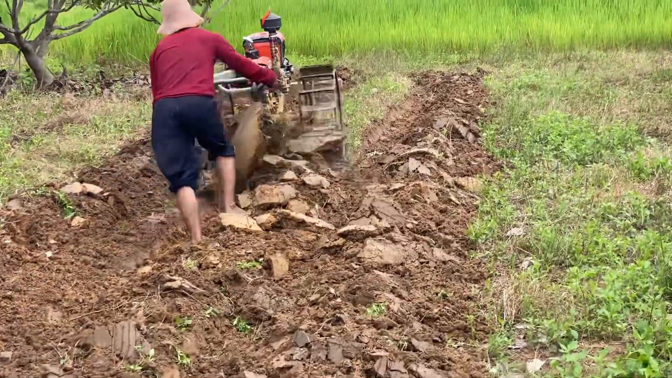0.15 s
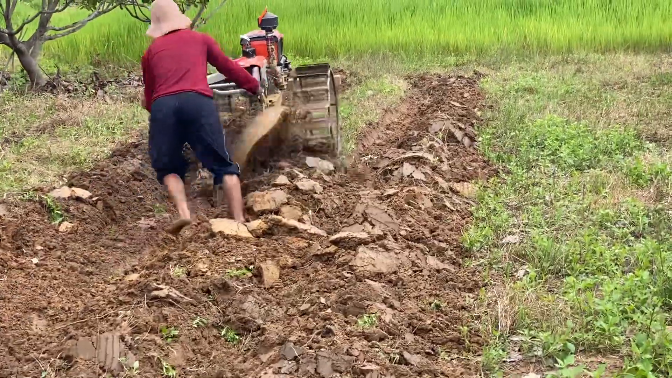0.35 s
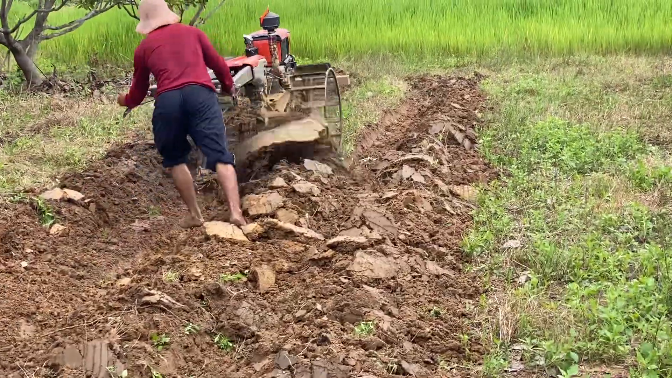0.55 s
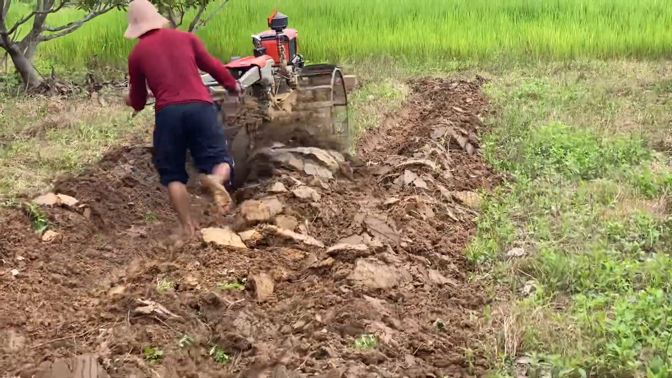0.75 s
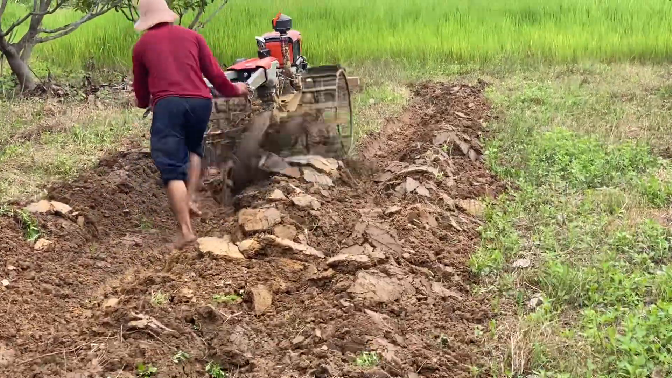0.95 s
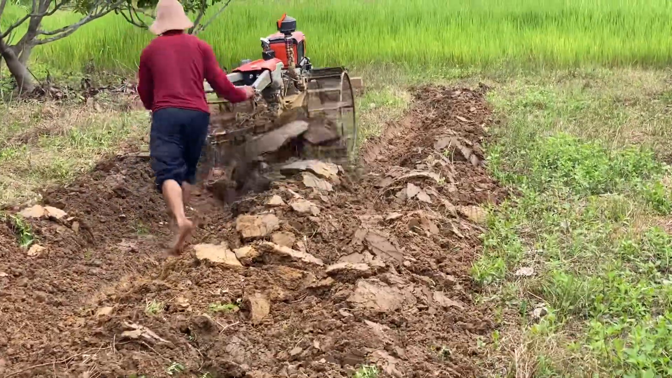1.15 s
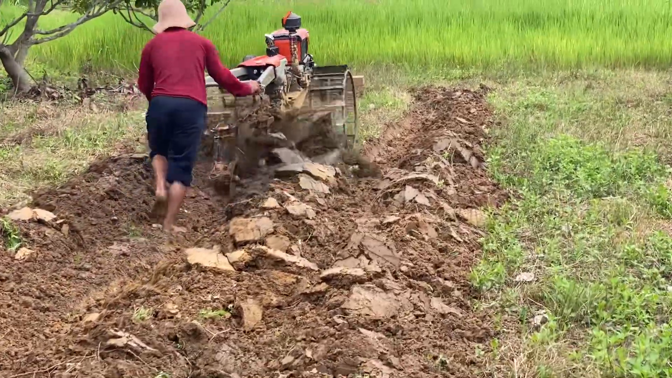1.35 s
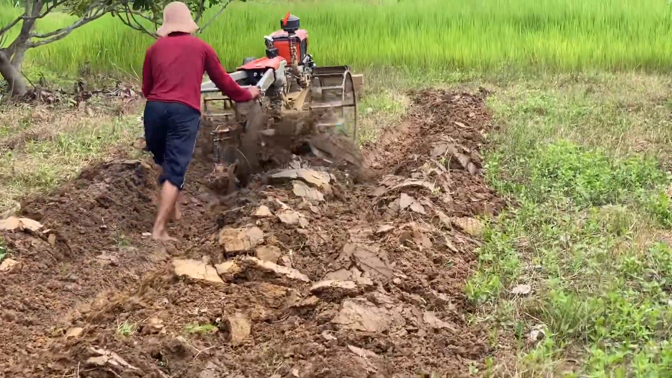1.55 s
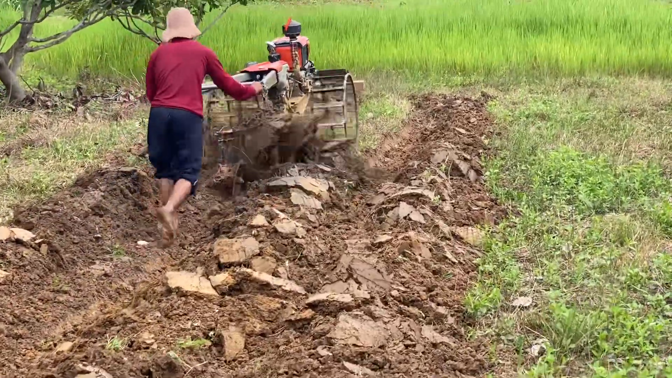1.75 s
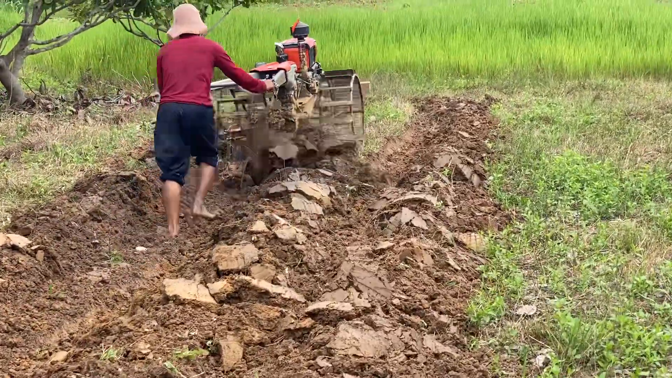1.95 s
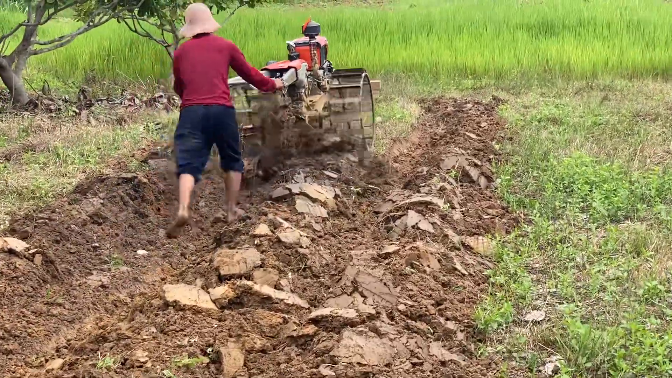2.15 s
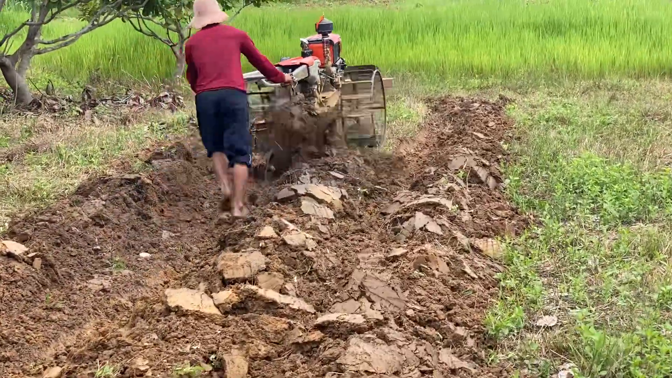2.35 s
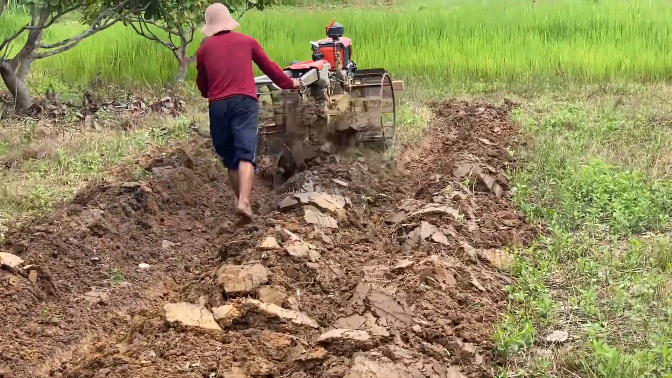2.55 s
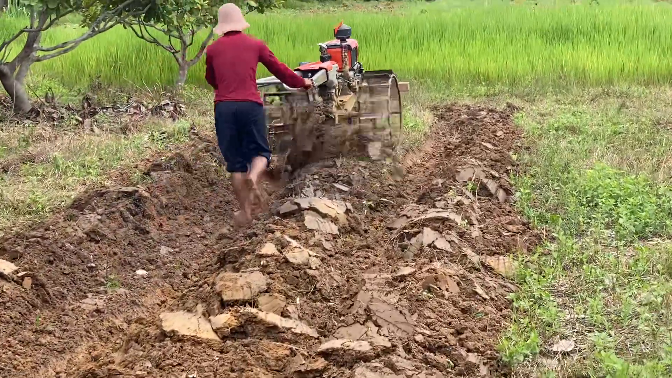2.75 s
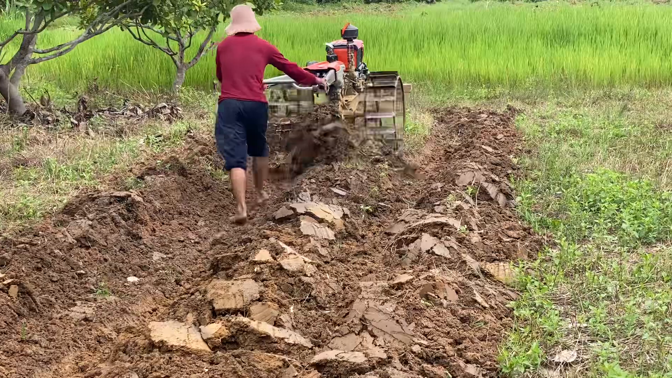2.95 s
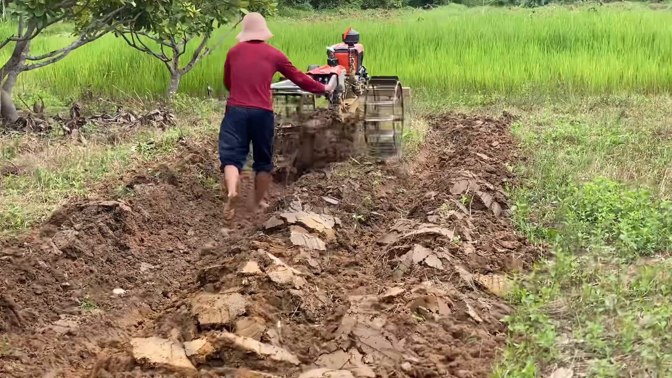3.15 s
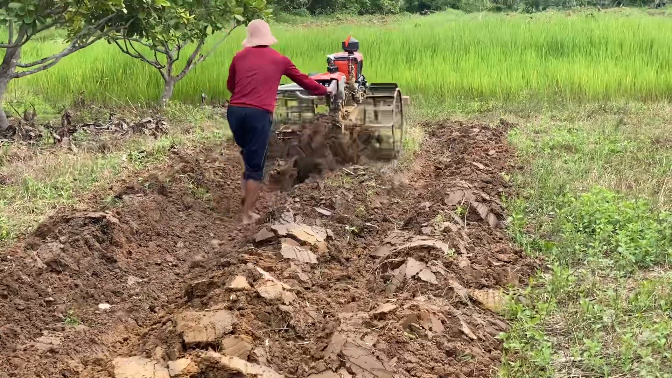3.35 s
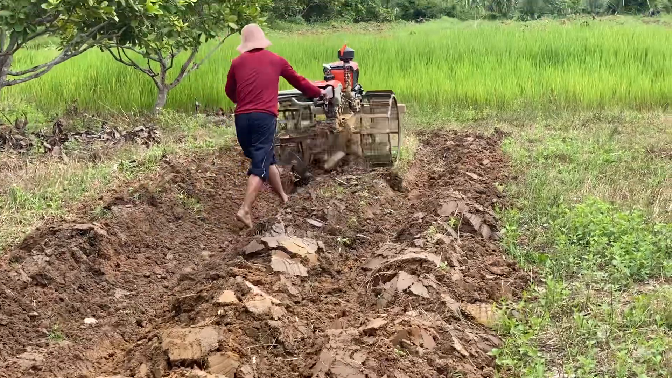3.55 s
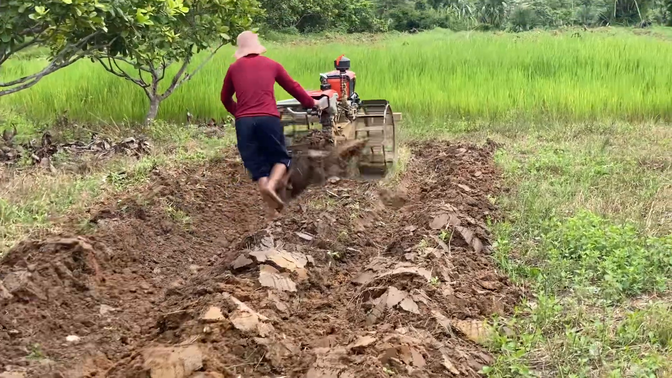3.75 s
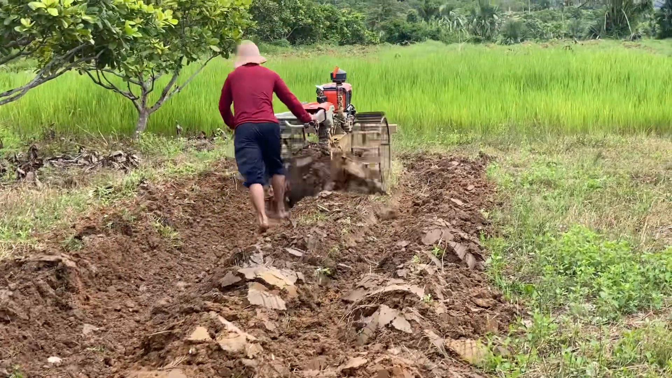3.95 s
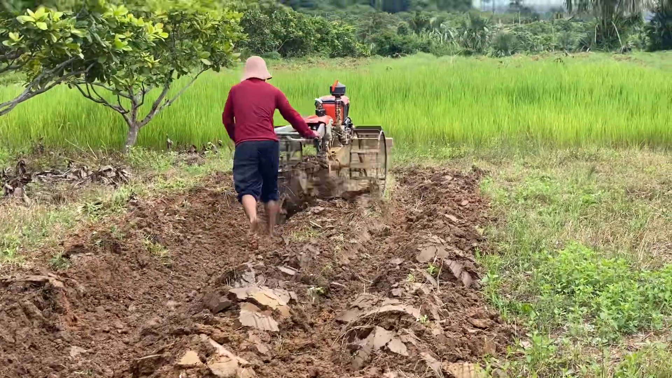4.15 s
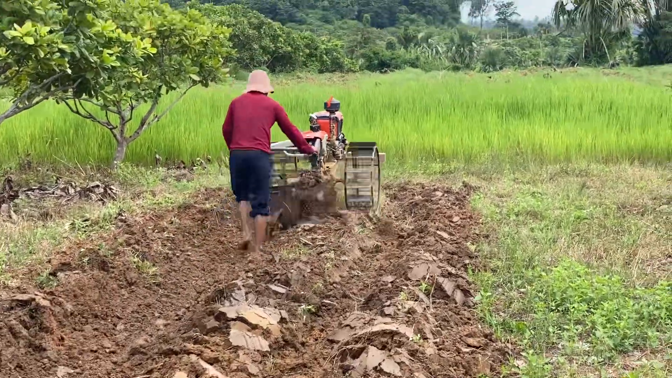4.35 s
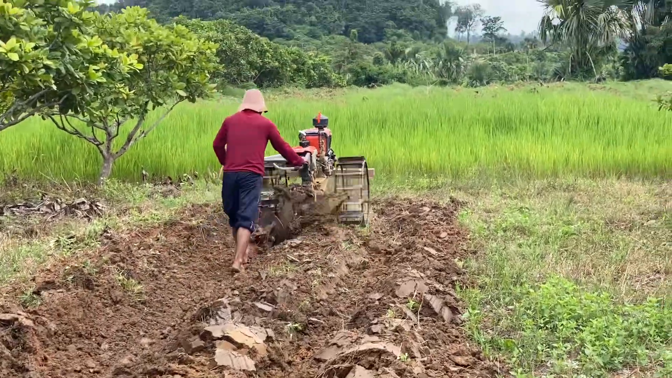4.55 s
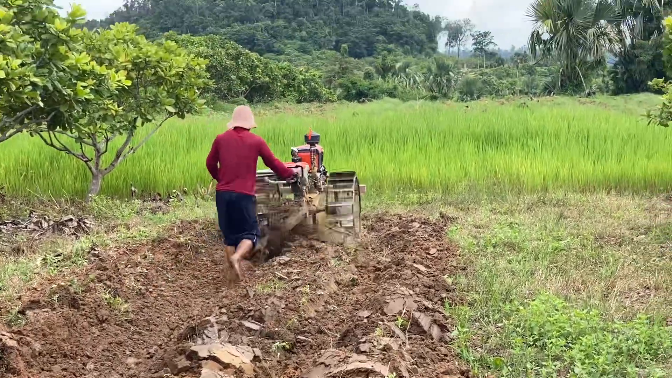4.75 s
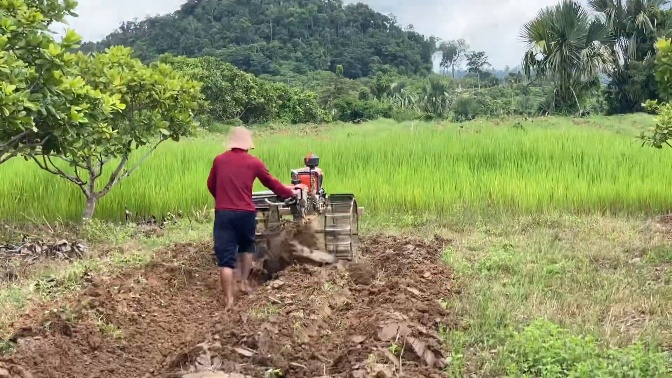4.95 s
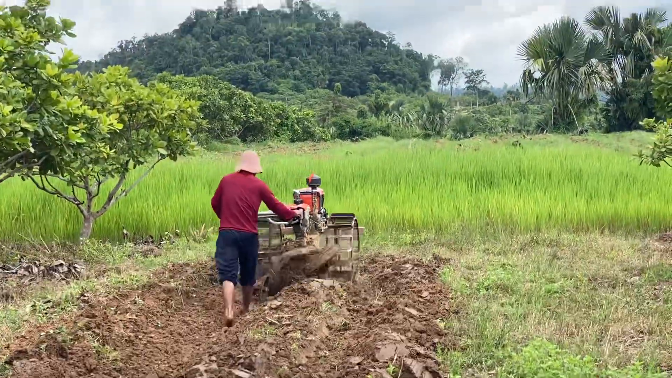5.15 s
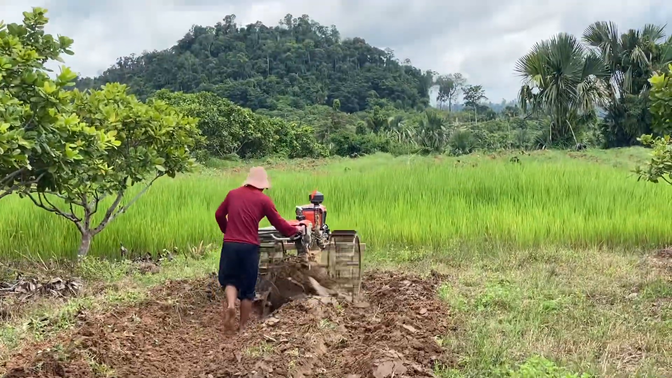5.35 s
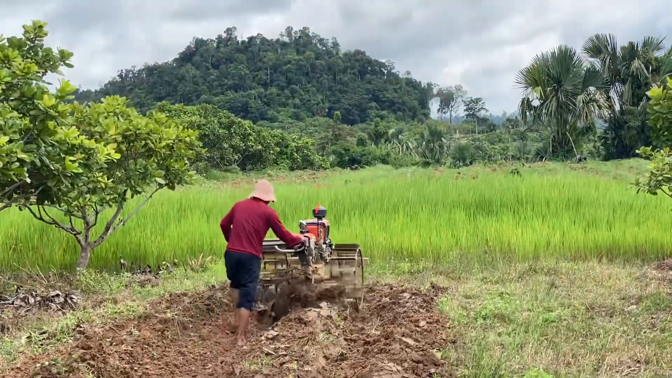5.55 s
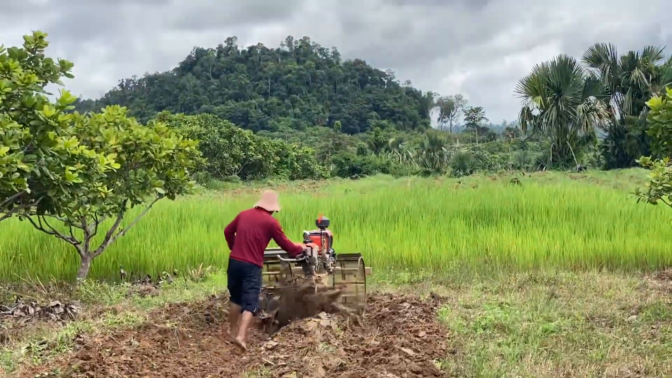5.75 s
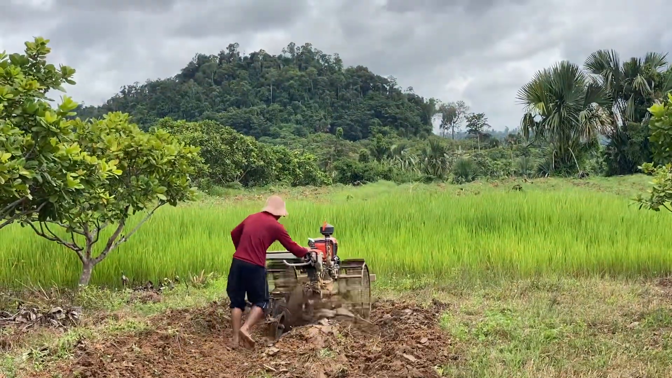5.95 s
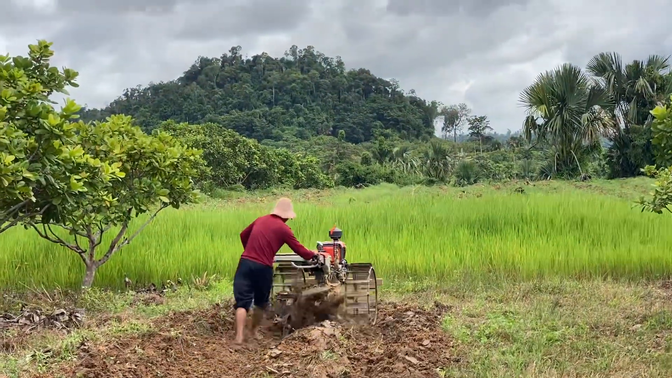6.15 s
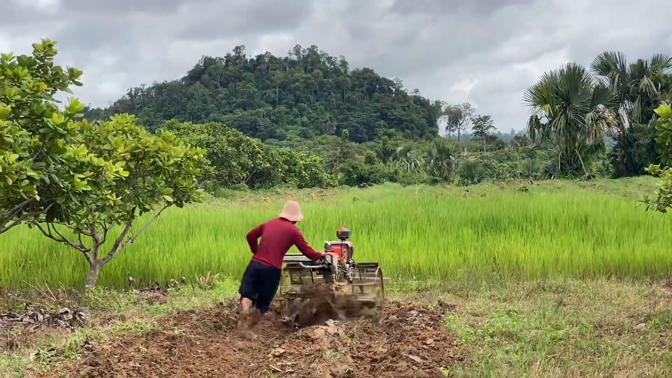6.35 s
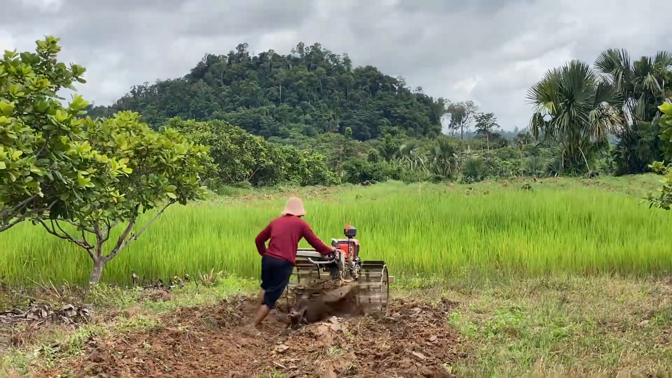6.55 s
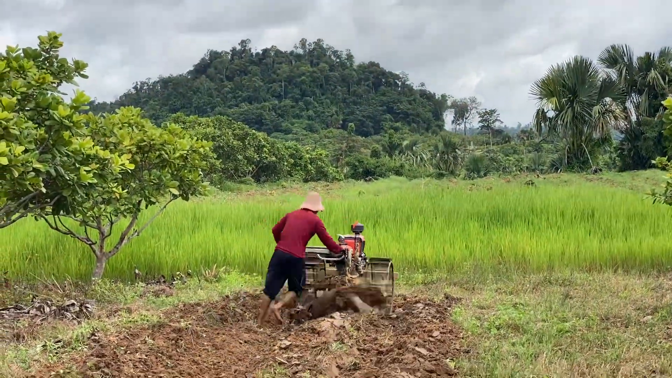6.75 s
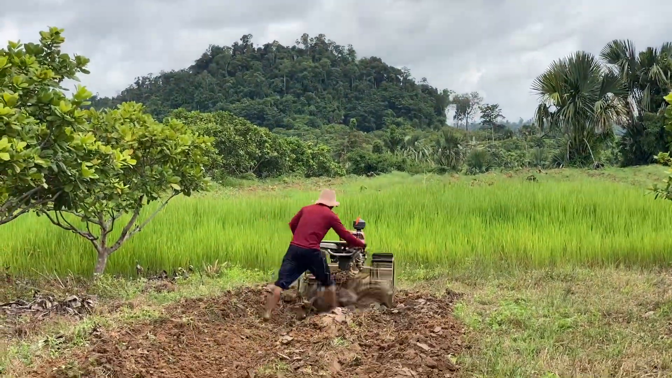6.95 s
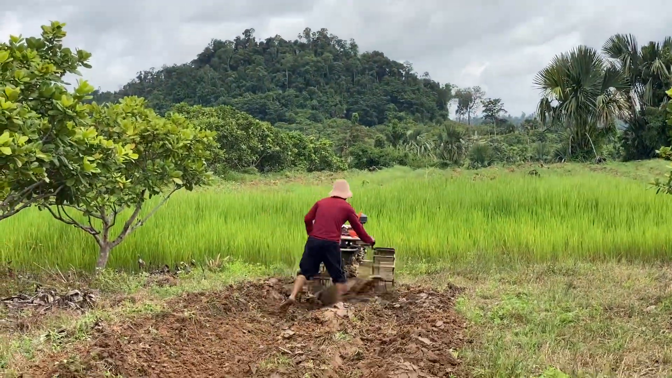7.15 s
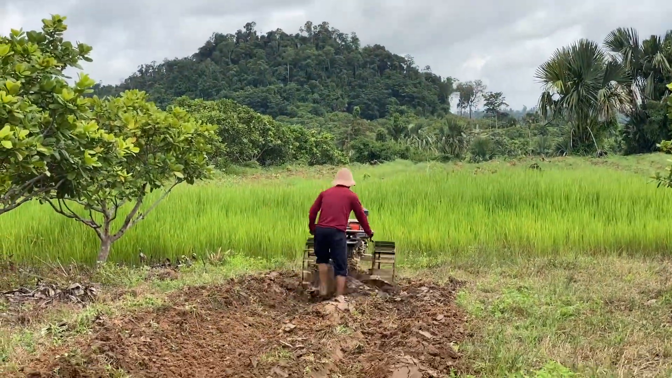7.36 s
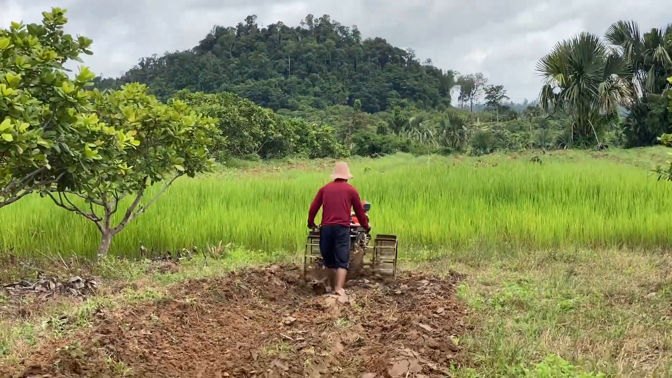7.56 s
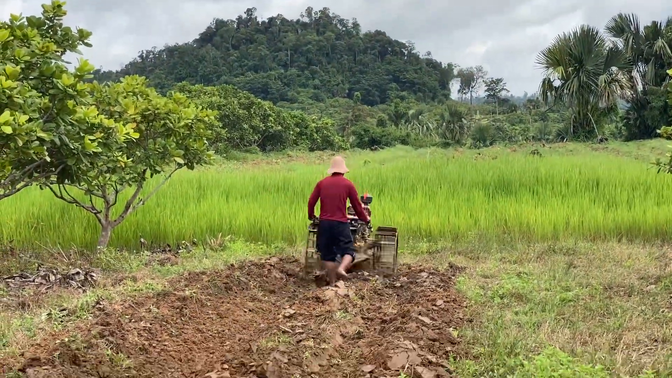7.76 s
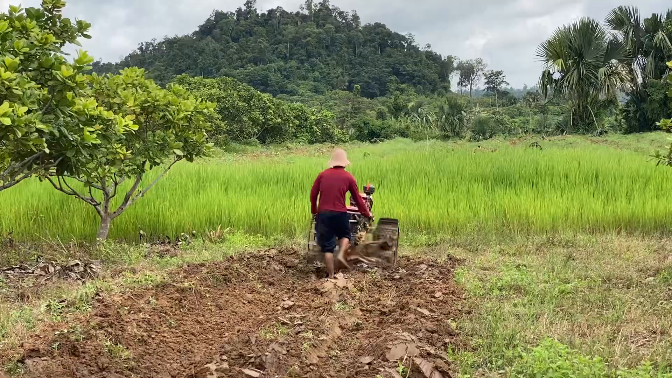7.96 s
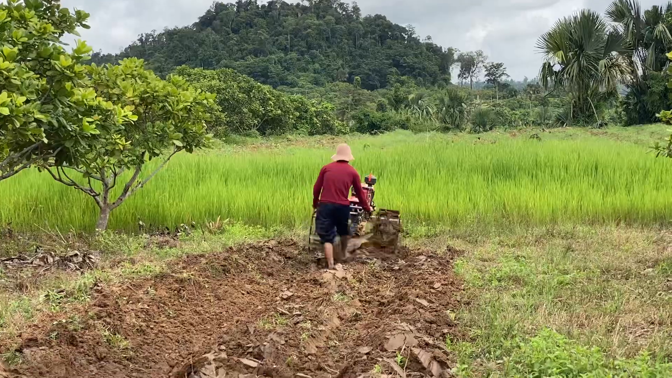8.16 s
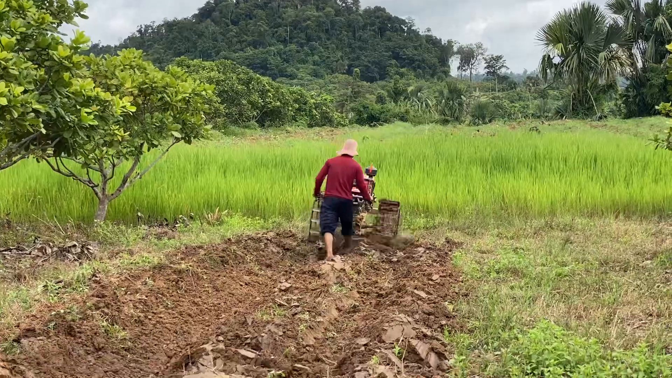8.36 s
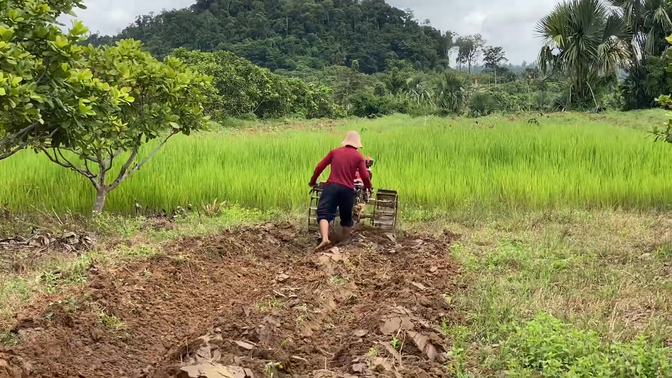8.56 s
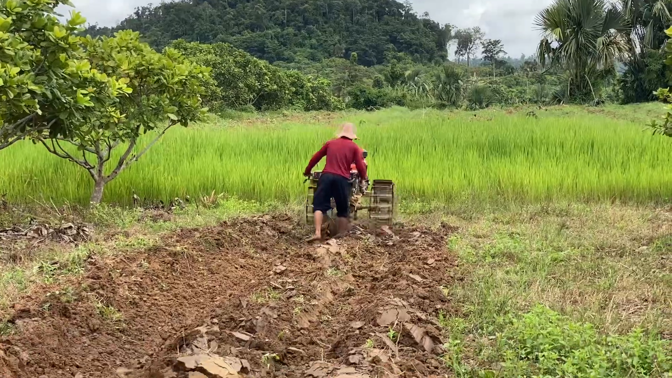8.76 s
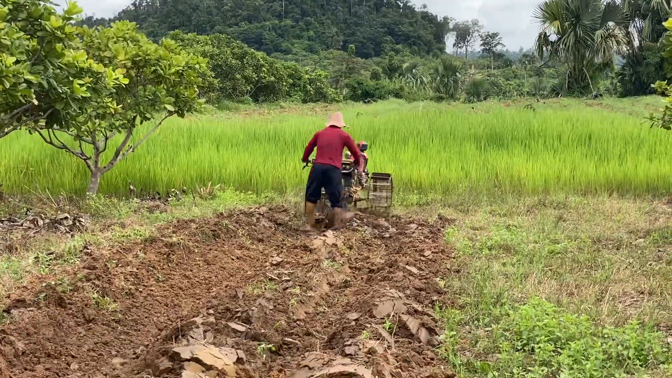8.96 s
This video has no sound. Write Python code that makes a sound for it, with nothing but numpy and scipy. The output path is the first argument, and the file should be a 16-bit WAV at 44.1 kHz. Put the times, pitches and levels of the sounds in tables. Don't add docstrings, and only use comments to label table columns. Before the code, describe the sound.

Fast thudding one-cylinder engine with metallic knocking and loose rattles recedes across an open field, sags in speed, while insects sing thinly and high.

```python
import sys
import numpy as np
from scipy import signal
from scipy.fft import rfft, irfft, next_fast_len
from scipy.io import wavfile
from scipy.ndimage import uniform_filter1d

SR = 44100
rng = np.random.default_rng(int(sys.argv[2]) if len(sys.argv) > 2 else 0)


def wav_record(signal):
    frames = np.transpose(np.atleast_2d(signal))
    bounded = np.clip(frames, -1, 1)
    quanta = np.round(bounded * 32767).astype(np.int16)
    wavfile.write(sys.argv[1], SR, quanta)


def gain_from_decibels(decibels):
    exponent = np.asarray(decibels, float) / 20
    return 10 ** exponent


N = 397773
TIME = np.arange(N) / SR
OVERLAP_SHARE, INTAKE_SHARE, KNOCK_SHARE, TICK_SHARE = .2847, .5427, .745, .43
TURN_S = 7.15


def along(table, hz):
    f, v = np.transpose(table)
    return np.interp(np.log(hz + 1), np.log(f + 1), v)


def colour(x, table):
    size = next_fast_len(N)
    hz = np.fft.rfftfreq(size, 1 / SR)
    return irfft(rfft(x, size) * gain_from_decibels(along(table, hz)), size)[:N]


def unit(x):
    return x / np.sqrt(np.mean(x ** 2))


def noise(table):
    return unit(colour(rng.standard_normal(N), table))


def walk(rate_hz):
    k = int(SR / rate_hz)
    steps = np.repeat(rng.standard_normal(N // k + 1), k)
    return 1.37 * uniform_filter1d(uniform_filter1d(steps, k), k)[:N]


def strike(times, gains, shape):
    train, lead = np.zeros(N + SR), SR // 4
    at = (np.asarray(times) * SR).astype(int) + lead
    np.add.at(train, np.clip(at, 0, N + SR - 1), gains)
    return signal.oaconvolve(train, shape)[lead:lead + N]


def fade(rise_s, t60_s):
    t = TIME[:SR // 3]
    return (1 - np.exp(-t / rise_s)) * np.exp(-np.log(1000) * t / t60_s)


def ring(modes, rise_s):
    t, out = TIME[:SR // 3], 0
    for hz, db, t60_s, *sign in modes:
        out = out + np.prod(sign) * gain_from_decibels(db) * np.sin(2 * np.pi * hz * t) * fade(rise_s, t60_s)
    return out


def resonate(push, modes, rise_s):
    return signal.fftconvolve(push, ring(modes, rise_s))[:N]


def moments(s, share):
    edges = np.concatenate([[2 * s[0] - s[1]], s, [2 * s[-1] - s[-2]]])
    return edges[:-1] + share * np.diff(edges)


def bump(times, at_s, half_s, db):
    return db * np.exp(-((times - at_s) / half_s) ** 2)


def overrun_db(times):
    return bump(times, 3.38, .2, 3)


# start_s, load_db, facing_db
WORK = [(0, -1, 0.5), (1.6, 1.5, -0.5), (1.75, .5, 2.5), (1.95, .5, 5.5), (3.16, 3, 7.5), (3.3, -2.5, 0.5),
        (3.6, -6, -1), (3.72, -7.5, 5), (3.84, -5, 9), (3.97, -0.5, 1.5), (4.25, 1, -2), (4.55, 3.5, 1.5),
        (4.8, 2, 3), (6.3, 2, 4), (6.95, 3, 3), (7.9, -0.5, 0), (8.15, 0, 2.5), (9.02, 0, -1.5)]


def rule(times, start_db, distance, load, facing):
    at, load_db, facing_db = np.transpose(WORK)
    leaving_db = -0.7432 * times
    return (start_db + distance * leaving_db + load * np.interp(times, at, load_db)
            + facing * np.interp(times, at, facing_db))


# start_s, speed_hz [cycles/s]
SPEED = [(0.0, 9.477), (1.248, 9.398), (1.683, 9.64), (2.256, 9.491), (3.097, 9.702), (3.846, 7.988),
         (3.92, 7.439), (4.39, 7.996), (4.442, 8.125), (4.573, 8.607), (5.003, 8.337), (5.798, 8.501),
         (6.634, 8.232), (6.93, 8.572), (8.252, 7.486), (8.407, 7.117), (8.679, 6.996), (9.02, 7.475)]
# start_s, level_db
LEAN = [(.533, -0.5), (3.262, -0.5), (4.719, -3.5), (4.956, -3), (5.434, -0.9), (5.669, -1.5),
        (6.143, -1.2), (7.098, -1), (7.338, -1.1), (7.965, -0.5), (8.227, -1), (8.364, -2.5), (8.926, -5)]


def firings():
    cycles = np.cumsum(np.interp(TIME, *np.transpose(SPEED))) / SR
    s = np.interp(np.arange(.0603, cycles[-1]), cycles, TIME)
    chance, lean_db = rng.standard_normal((5, len(s))), np.zeros(len(s))
    for t, db in LEAN:
        lean_db[np.argmin(abs(s - t))] = db
    turned = s > TURN_S
    light_db = np.minimum(rule(s, 0.5, 0, 1, 0), 0)
    puff_loss_db = np.maximum(5.5 * (lean_db + light_db), -24)
    thud_db = rule(s, 4, 1.65, 1.08, -0.06) + lean_db + 1 * turned + .5 * chance[0]
    echo = rule(s, 0.64, 0, 0.1, -0.0817) + 0.31 * turned + 0.09 * chance[1]
    knock_db = rule(s, -27.5, 1.58, 0.66, 0.78) + light_db + 1.4 * chance[2]
    puff_db = rule(s, -36.5, 1.78, 2.03, -0.84) + puff_loss_db - 3.5 * turned + 0.5 * chance[3]
    clack = turned * gain_from_decibels(-30.5 + 3.5 * lean_db + 3 * chance[4])
    return s, thud_db, echo, knock_db, puff_db, clack


# pitch_hz, level_db, t60_s, polarity
EXHAUST = [(52, -20.8, .153, 1), (60, -18.9, .101, 1), (85, -.7, .0346, -1), (142, 2.8, .0153, 1),
           (205, -24, .04, -1)]


def exhaust(s, thud_db, echo):
    pipe_echo_s = .0132
    gains = np.append(gain_from_decibels(thud_db), echo * gain_from_decibels(thud_db))
    return strike(np.append(s, s + pipe_echo_s), gains, ring(EXHAUST, .012))


# pitch_hz, level_db, t60_s, polarity
OVERLAP = [(112, 8.1, .0322, -1), (114, 8.7, .0285, 1), (201, -17.5, .0244, 1)]


def overlap(s):
    times = moments(s, OVERLAP_SHARE)
    level_db = rule(times, 5.5, 0.97, 0, 0.2) + overrun_db(times)
    return strike(times, gain_from_decibels(level_db + 0.69 * rng.standard_normal(len(times))), ring(OVERLAP, .013))


# pitch_hz, level_db, t60_s, polarity
INTAKE = [(105, -11.1, .1, -1), (106, -9.5, .04, 1), (207, -30, .07, -1)]


def intake(s):
    times = moments(s, INTAKE_SHARE)
    level_db = rule(times, 4.5, 1.6, 0.05, 0.27) + bump(times, 3.85, 0.13, -3.5) + overrun_db(times)
    return strike(times, gain_from_decibels(level_db + 0.69 * rng.standard_normal(len(times))), ring(INTAKE, .0139))


# pitch_hz, level_db, t60_s
BLOCK = [(560, -13.5, 0.054), (801, -14.5, 0.073), (892, -11, 0.072), (1235.6, -3, 0.043),
         (1297, -14, 0.083), (1435, 3, 0.027), (1511.6, -4, 0.075), (1490, -49, 0.012),
         (1810, -15.5, 0.089), (2270, -10.5, 0.035), (2770, -14, 0.043), (3170, -12, 0.023),
         (4590, -22, 0.02), (5800, -37.5, 0.0086)]


def knock(s, knock_db, clack):
    times, size = moments(s, KNOCK_SHARE)[:-1], gain_from_decibels(knock_db)
    push = strike(times, size, np.ones(1))
    push += gain_from_decibels(-27.5) * strike(times, size, fade(.001, .05)) * rng.standard_normal(N)
    push += strike(s - .00137, gain_from_decibels(-7.0) * clack, np.ones(1))
    return gain_from_decibels(4) * resonate(push, BLOCK, 0.00095)


# pitch_hz, level_db
PUFF = [(300, -14.5), (700, -10), (1480, -24), (1890, -16.5), (3150, -15), (3900, -25), (4620, -19.5),
        (5810, -25), (6600, -22), (8410, -28), (10100, -36), (12000, -33.5), (15600, -57)]
# pitch_hz, level_db, t60_s
TIN = [(2220, 2, 0.011), (2880, -9, 0.15), (3208, -7, 0.086), (4600, 5, 0.011), (5330, -18, 0.02),
       (6505, 4, 0.0093)]


def puff(s, puff_db):
    gust = strike(s - .0035, gain_from_decibels(puff_db), fade(0.0012, 0.04))
    shaken = resonate(gust * rng.standard_normal(N), TIN + BLOCK, 0.00086)
    return gain_from_decibels(13.5) * gust * noise(PUFF) + gain_from_decibels(-15.5) * shaken


# pitch_hz, level_db [per Hz]
CLATTER = [(150, -10.5), (250, -1), (340, -6), (593, -13), (902, -9), (1110, -12), (1210, -6.5),
           (1490, -8.5), (1710, -15.5), (2750, -16), (3840, -24), (4540, -24.5), (7000, -30.5), (9100, -51),
           (15400, -120)]


def rattle():
    out = 0
    for hz in 250 * 2 ** np.arange(0, 5.5, .5):
        edges_hz = [hz / 2 ** 0.21, hz * 2 ** 0.23]
        sos = signal.butter(2, edges_hz, "band", fs=SR, output="sos")
        out = out + gain_from_decibels(2.78 * walk(60)) * signal.sosfilt(sos, rng.standard_normal(N))
    return unit(colour(out, CLATTER))


# pitch_hz, level_db
HISS = [(6000, -3.5), (7200, -8.5), (8000, -0.5), (9200, -8), (10800, -14), (12000, -12), (13200, -60),
        (15500, -28)]


def clatter(s):
    level_db = rule(TIME, -45.5, 1.19, 0.42, 0.06)
    shake = 0.36 + strike(moments(s, KNOCK_SHARE)[:-1], 1., fade(0.00048, 0.39))
    shake += strike(s, 0.48, fade(0.014, 0.31))
    shake += strike(moments(s, OVERLAP_SHARE), 0.55, fade(0.0016, 0.043))
    shake += strike(moments(s, 0.22), 0.45, fade(0.0033, 0.034))
    taps = (rng.random(N) < 180 / SR) * rng.standard_normal(N) * shake
    tapped = unit(resonate(taps, BLOCK + TIN, 0.00029))
    rattling = shake * (rattle() + gain_from_decibels(-12) * noise(HISS))
    return gain_from_decibels(level_db + 6) * rattling + gain_from_decibels(level_db - 7.5) * tapped


# start_s, level_db, length_s
SCRAPES = [
    (2.282, -39.5, 0.053),
    (4.358, -39, 0.071),
    (6.762, -30.5, 0.059),
    (6.96, -38, 0.082),
]


def scrape():
    rub = sum(strike([t], gain_from_decibels(db), fade(.002, 3 * length_s)) for t, db, length_s in SCRAPES)
    rub = rub * gain_from_decibels(3.5 * walk(300))
    share = resonate(rub * rng.standard_normal(N), [(3650, -0.5, 0.034), (3860, -18, 0.021)], 0.00033)
    grit = noise([(500, 0), (1500, 6.5), (3700, 3), (5200, -1.0), (7000, -8), (12000, -20)])
    return gain_from_decibels(-29.5) * share + rub * grit


def iron(s, knock_db, puff_db, clack):
    return knock(s, knock_db, clack) + puff(s, puff_db) + clatter(s) + scrape()


def uneven_rings(times, modes, level_db):
    level_db, out = level_db + overrun_db(times), 0
    for mode in modes:
        gains = gain_from_decibels(level_db + 4.5 * rng.standard_normal(len(times)))
        out = out + strike(times, gains, ring([mode], 0.0026))
    return out


# pitch_hz, level_db, t60_s
FRAME = [(330, 5, .05), (403, 2.5, 0.046), (524, -1, .04)]


def frame(s):
    times = moments(s, KNOCK_SHARE)
    return uneven_rings(times, FRAME, rule(times, -45, -1, -.5, -.2))


# pitch_hz, level_db, t60_s
TICK = [(3410, 9, 0.038), (2150, -11, .03)]


def pushrod(s):
    times = moments(s, TICK_SHARE)
    return uneven_rings(times, TICK, rule(times, -49, 1.5, .3, -.6))


def gear():
    pitch_hz = 1035 * (1 + .009 * walk(3.6) + 0.0097 * walk(25))
    phase = 2 * np.pi * np.cumsum(pitch_hz) / SR
    load_db = np.interp(TIME, [3.3, 3.45, 3.75, 3.9, 4.5, 4.8], [0.5, -6, -12, -3, -8, -17.0])
    return gain_from_decibels(-50.5 + 3.6 * walk(30) + load_db) * np.sin(phase)


# pitch_hz, level_db
SOIL = [(150, -18), (260, -5), (380, 7.5), (520, -2.5), (800, -28)]


def soil():
    lumps = (rng.random(N) < 45 / SR) * gain_from_decibels(10.4 * rng.standard_normal(N))
    heave = 0.19 + unit(signal.oaconvolve(lumps, fade(0.0024, 0.074))[:N])
    return gain_from_decibels(rule(TIME, -55.5, 1.8, -0.5, 0.4)) * heave * noise(SOIL)


# pitch_hz, width_hz, flicker_hz, swing_db
INSECTS = [(7440, 45, 22, 3), (13400, 180, 25, 3.5), (14620, 90, 30, 3.5)]
# start_s, level_db
INSECT_HUSH = [
    (3.27, 0),
    (3.36, -8),
    (3.93, -7),
    (3.97, 0),
]


def insects():
    hush_db = np.interp(TIME, *np.transpose(INSECT_HUSH))
    start_db, fall_db_per_s, swell_db = (-55.5, -79, -75), (-0.66, -.5, -0.44), (1.5, 2.5, .7)
    out = 0
    for (hz, width, flicker_hz, swing_db), db, fall, swell in zip(INSECTS, start_db, fall_db_per_s, swell_db):
        level_db = db + fall * TIME + hush_db + swell * walk(8)
        for shift, far_db in ((1, 2.5), (1.018, -3.5), (1.045, -2.5)):
            top = hz * shift
            band = noise([(top - 5 * width, -40), (top - width / 2, -4), (top, 0),
                          (top + width / 2, -4), (top + 5 * width, -40)])
            out = out + gain_from_decibels(level_db + far_db + swing_db * walk(flicker_hz)) * band
    return out


# start_s, level_db
HIGH_BURSTS = [(0.18, -69), (0.3212, -65), (0.8325, -57), (1.0455, -56.5), (1.3633, -73.5), (1.479, -56),
               (1.6776, -52), (1.7594, -55), (2.2822, -44), (2.5606, -54), (3.2266, -61), (4.2188, -56),
               (4.4054, -54), (4.4623, -52), (4.7037, -54), (5.1407, -57), (5.7663, -57), (5.893, -49),
               (5.9524, -55), (6.5296, -60), (6.6667, -49), (6.7296, -53), (6.9057, -59), (7.8211, -66)]


def high_bursts():
    s, db = np.transpose(HIGH_BURSTS)
    voice = noise([(14200, -33), (14550, -3), (14620, 0), (14700, -5), (15000, -40)])
    return strike(s, gain_from_decibels(db + 1), fade(.002, 0.14)) * voice


# pitch_hz, level_db
SCATTER = [(60, -51), (400, -14), (1000, -13.5), (1500, -7), (2200, -12), (3000, -17), (6500, -42),
           (7200, 0), (9000, -41), (9700, -30), (12000, -23), (15000, -18)]


def scatter(rattling, singers):
    return gain_from_decibels(-2.0) * colour(rattling, SCATTER) + gain_from_decibels(-22.5) * np.roll(singers, SR // 30)


# pitch_hz, level_db
BALANCE = [(60, -0.5), (110, -0.5), (200, -1.0), (380, -1.5), (700, -3.0), (1290, -1.0), (2380, 0.5),
           (4400, 0.0), (8120, 0.0), (15000, 0.0)]
# pitch_hz, lead_rad
LEAD = [(60, 0.04), (1550, 0.2), (1890, 0.1), (6890, -0.0), (8350, -2.8), (8870, -3.5), (9130, -5.0),
        (9730, -6.2), (10900, -6.6), (11400, -9.3), (12800, -9.5), (13300, -12.2), (14400, -12.7),
        (15300, -15.6)]


def ports(mid, side):
    size = next_fast_len(N)
    hz = np.fft.rfftfreq(size, 1 / SR)
    half = gain_from_decibels(along(BALANCE, hz) / 2) * np.exp(.5j * along(LEAD, hz))
    both = irfft(rfft(mid, size) * np.array([half, 1 / half]), size)[:, :N]
    return both + side * np.array([[1], [-1]])


def scene():
    s, thud_db, echo, knock_db, puff_db, clack = firings()
    gas = exhaust(s, thud_db, echo) + overlap(s) + intake(s)
    machine = iron(s, knock_db, puff_db, clack) + frame(s) + pushrod(s) + gear()
    singers = insects() + high_bursts()
    side = scatter(iron(s, knock_db, puff_db, clack), singers)
    return ports(gas + machine + soil() + singers, side)


# pitch_hz, level_db
MICROPHONE = [(18, -37), (31, 2), (140, 1), (200, 5), (260, 3), (330, -3), (500, 1), (16000, -0.5)]


def microphone(dry):
    return np.array([colour(port, MICROPHONE) for port in dry])


def roll_off(x):
    return signal.sosfilt(signal.butter(12, 15750, fs=SR, output="sos"), x)


def record(dry):
    mix = microphone(dry)
    return roll_off(mix)


dry = scene()
out = record(dry)
wav_record(out)
```